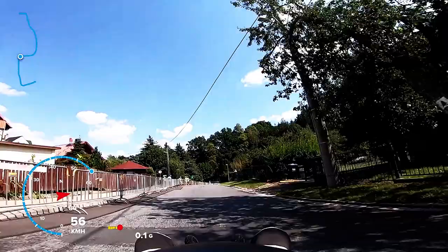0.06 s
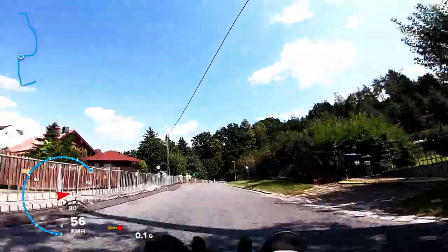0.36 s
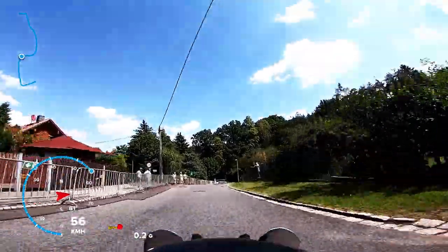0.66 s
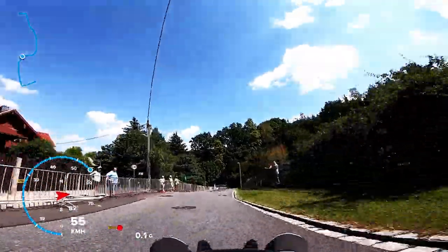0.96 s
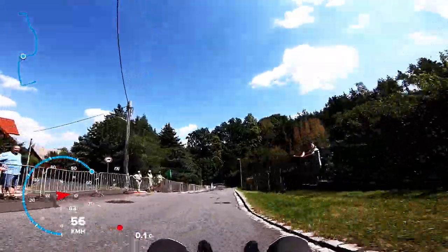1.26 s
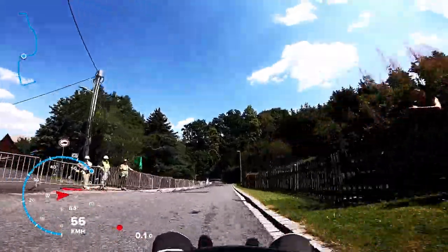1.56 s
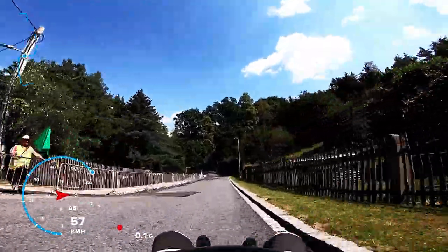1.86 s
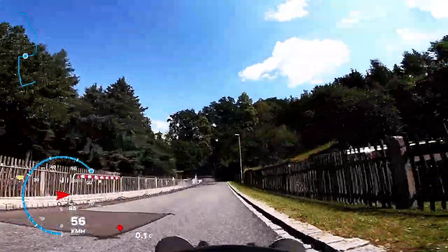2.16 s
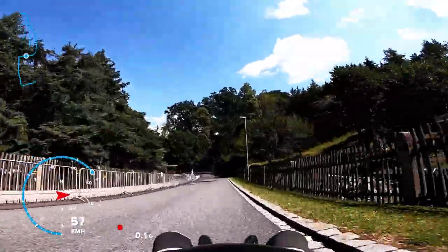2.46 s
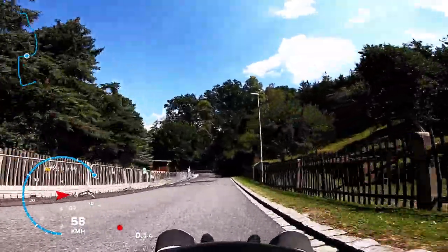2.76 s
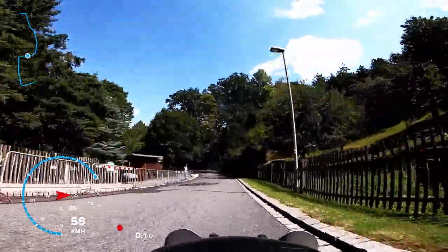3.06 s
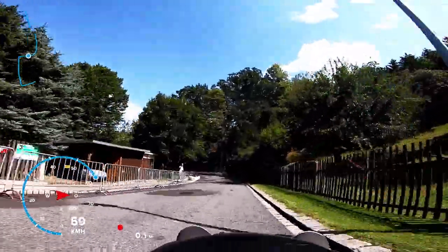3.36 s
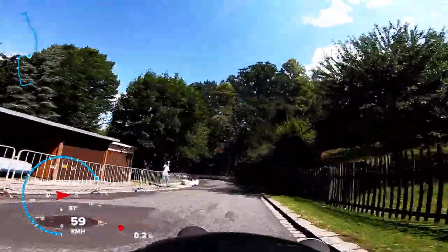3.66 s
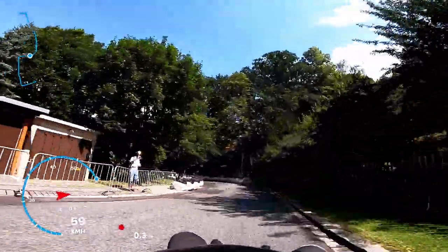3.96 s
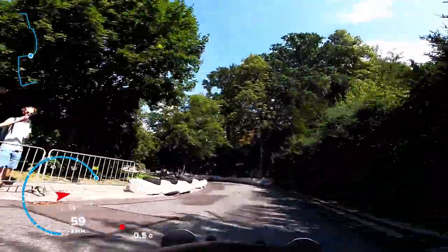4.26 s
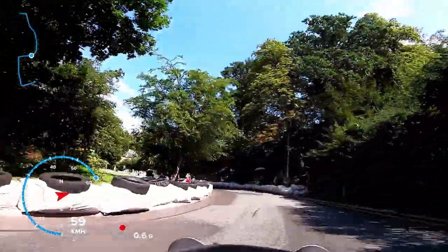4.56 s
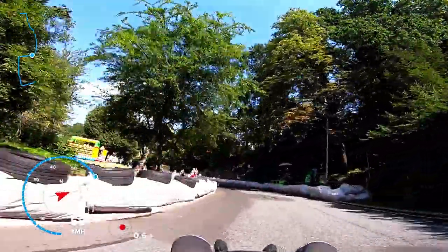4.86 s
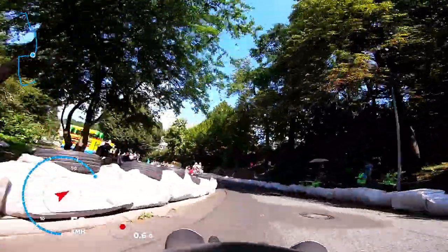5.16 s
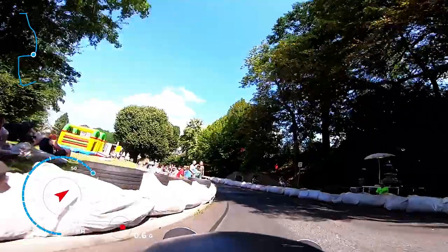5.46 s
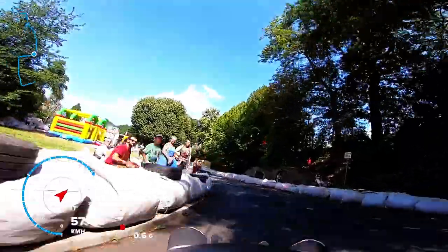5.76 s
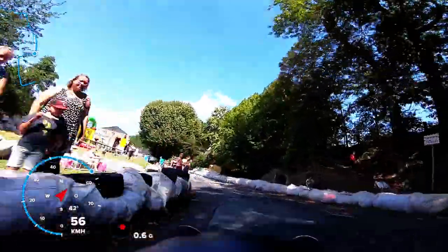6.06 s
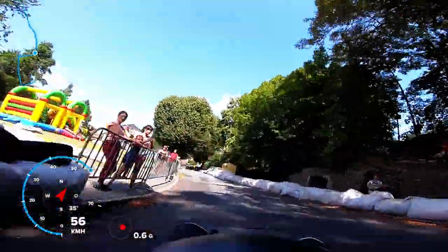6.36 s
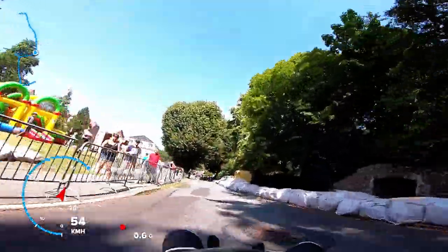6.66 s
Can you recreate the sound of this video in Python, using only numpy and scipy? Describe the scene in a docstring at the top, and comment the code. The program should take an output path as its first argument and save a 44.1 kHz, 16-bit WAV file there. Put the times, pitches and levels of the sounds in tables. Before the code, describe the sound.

A gravity cart rolls fast down an asphalt road, heard from a microphone fixed to its body. Gusts of wind rumble on the microphone and air hisses past, while the small wheels thrum and drum through the frame. Bumps knock and loose fittings rattle along the way. A little past halfway the tyres rasp into a bend and keep scrubbing as the hollow shell booms louder.

```python
"""Gravity cart racing into a bend

A cart rolls fast down an asphalt road, heard from a microphone fixed to its body. Wind buffets the
microphone and hisses past. The rough road drums through small wheels into the frame and hollow shell.
Bumps knock, loose fittings rattle, grit ticks, and the tyres scrub in the bend. A limiter tames the bass."""
import sys
import numpy as np
from scipy import signal
from scipy.fft import rfft, irfft
from scipy.io import wavfile
from scipy.ndimage import uniform_filter1d, minimum_filter1d

SR = 44100
rng = np.random.default_rng(int(sys.argv[2]) if len(sys.argv) > 2 else 0)


def output_pcm(signal):
    """Save a mono or channel-first signal as 16-bit PCM at the path in sys.argv[1].

    Samples are clipped to [-1, 1] before scaling.
    """
    pcm = np.clip(np.atleast_2d(signal).T, -1, 1) * 32767
    wavfile.write(sys.argv[1], SR, np.round(pcm).astype(np.int16))


N = 300321

# Larger bumps and seams in the road: start_s, level_db, contact_s
BUMP_HITS = [(0.361, -19, 0.00039), (0.424, -15, 0.00037), (0.571, -22, 0.00062), (1.506, -16, 0.00063),
             (1.571, -17, 0.00036), (1.7845, -7, .00042), (2.2813, -14.5, .0005), (2.2978, -15.5, .0005),
             (2.3729, -13, .00042), (2.853, -20, 0.00041), (3.663, -16, .00035), (3.6972, -12.5, 0.00032),
             (3.7065, -15, .0006), (4.205, -18, 0.0008), (4.873, -14.5, 0.00048), (6.227, -10, .0007),
             (6.3593, -20, 0.0004), (6.702, -14, 0.00032), (6.781, -12, 0.00037)]
# Louder rattles of loose fittings: start_s, level_db, pitch_hz
RATTLE_HITS = [(0.0225, -24, 2450), (0.2235, -31, 1700), (0.2768, -27, 1590), (0.5072, -27.5, 1670),
               (0.9205, -27.5, 2280), (0.9874, -29, 3320), (1.1688, -27.5, 1200), (1.5731, -29, 3000),
               (1.776, -24, 1700), (1.8118, -29, 3300), (1.9561, -24, 2660), (1.973, -32, 2800),
               (2.1001, -26, 2900), (2.2825, -28.5, 3500), (2.3216, -28, 2000), (3.6631, -32, 1800),
               (4.527, -26.5, 3700), (4.5597, -23.5, 1880), (4.7321, -25.5, 3880)]
# Grit flicked against the shell: start_s, level_db
GRIT_HITS = [(0.3257, -45), (1.4287, -45), (2.376, -49), (3.7983, -43), (4.3231, -45), (6.119, -48)]
# Notes at which the frame rings: pitch_hz, width_hz, level_db
FRAME_NOTES = [(353, 73, -2), (459.3, 107, -1), (531.4, 131, -2.5), (674, 104, -7), (775, 65, -10),
               (1204, 250, -20), (1498, 84, -20)]

# Tone colours, from low to high: frequency_hz, level_db
RUSH_COLOUR = [(1800, -2), (2600, -1.5), (3350, -1.5), (4300, -6), (5200, -11.5), (6400, -22),
               (8800, -21.5), (9800, -34)]  # air rushing past
WHISPER_COLOUR = [(4500, -4.5), (5500, 1.5), (6500, -0.5), (7350, 0.5), (7900, -7), (8750, -4),
                  (9600, -18.5), (10500, -14.5), (12000, -28.5)]  # air on the housing's edges
BUFFET_COLOUR = [(15, -9.5), (26, 9.5), (45, 15), (70, 11), (100, -15.5), (160, -27)]  # wind on the microphone
SCRUB_COLOUR = [(420, 0.5), (560, -9), (680, 2.5), (800, -0.5), (920, -4.5), (1300, -33), (3400, -30.5),
                (4600, -27), (6200, -44), (9000, -44.5)]  # tyres slipping sideways
TREAD_COLOUR = [(500, -5), (800, 1.5), (1020, 0), (1480, -1.5), (1680, -6), (2150, -8.5), (3200, -21.5),
                (5000, -35.5)]  # tread slapping the road
THRUM_COLOUR = [(58, -8), (80, 2), (118, -0.8), (143, -6.5), (170, -18.5), (220, -31)]  # wheels shaking on their tyres
BOOM_COLOUR = [(130, -2), (165, -1.5), (200, -1), (240, -2), (285, -6.5), (345, -8.5), (430, -30.5)]  # the hollow shell

# Slow rises and falls around the usual strength: time_s, level_db
ROAD_SHAKE = [(0.0, 0), (0.04, 4), (0.08, -5), (0.24, -1), (0.44, -0.5), (0.72, -4.5), (0.89, -6.5),
              (0.95, -2), (1.16, -7.5), (1.3, -2.5), (1.46, -8), (1.53, -2.5), (1.66, -4), (2.07, 1),
              (2.16, -3.5), (2.3, 3), (2.38, -3.5), (2.44, -2), (2.56, -5), (2.64, 0.5), (2.74, -3.5),
              (2.86, 3.3), (2.97, -4.5), (3.22, -4), (3.48, -5.5), (3.7, -0.5), (3.76, -4.5), (4.18, 2.5),
              (4.29, -1), (4.81, 3), (5.08, 0), (5.34, 3.5), (5.58, 0), (5.75, 6), (5.82, 0.6), (6.15, 4),
              (6.23, 0), (6.3, 4), (6.34, -1.5), (6.38, 4.5), (6.76, 3)]  # how hard the road shakes the cart
AIR_STRENGTH = [(0.0, 4), (0.08, -3.5), (0.3, 2), (0.48, -0.5), (0.6, -5.5), (0.85, -4.5), (1.32, -1),
                (1.48, -3.5), (1.72, 0), (2.0, 1.5), (2.32, -1.5), (2.44, -3.5), (2.8, 0.5), (3.45, 2.5),
                (3.69, 4.5), (3.75, -0.5), (3.85, 5), (4.08, 4), (4.55, 4), (5.04, 0.5), (5.28, 2.2),
                (5.6, 3), (5.72, 6), (5.85, 3.5), (6.14, 4.2), (6.45, 2.5), (6.76, -4)]  # airflow past the body
GUST_STRENGTH = [(0, 0.5), (.3, -3), (.5, 11), (.62, -1.5), (.75, 2.5), (1.2, -3), (1.48, -1), (1.65, -3.5),
                 (1.8, -4.5), (2.13, -1.5), (2.28, 8), (2.55, -3.5), (2.95, 4), (3.15, -0.5), (3.35, 3),
                 (3.62, 6), (3.95, -6), (4.55, 3.5), (5.15, -3), (5.35, -1.5), (5.65, -2.5), (6.0, -1.5),
                 (6.15, -4), (6.6, 4)]  # gusts on the microphone
THRUM_STRENGTH = [(0, -.5), (.2, 1.5), (.42, 1.5), (.65, 2), (1.05, -3.5), (1.22, 2), (1.52, -4.5),
                  (1.65, 0.5), (1.97, -0.5), (2.1, 2.5), (2.5, -1), (3.22, 2), (3.37, -3), (4.03, 2.5),
                  (4.17, -2), (4.28, 2), (4.45, -0.5), (5.3, -0.5), (5.6, -3), (6.05, -1), (6.6, -5.5)]  # the wheels' thrum

# Surges of load that make the shell boom and the frame drum: middle_s, length_s, rise_db
LOAD_SURGES = [(0.03, 0.025, 2.5), (0.13, 0.061, 7), (0.37, 0.36, 3), (4.22, 0.049, 2.5),
               (5.07, 0.087, 7.5), (5.17, 0.13, 4), (5.33, 0.076, 2.5), (6.1, 0.33, 2.5), (6.24, 0.1, 1),
               (6.6, 0.13, 2.5), (6.7, 0.029, 7)]
# Brief dips in the low rumble: middle_s, length_s, change_db
RUMBLE_DIPS = [(0.37, 0.045, -16), (1.16, 0.026, -4), (1.365, 0.018, -14), (2.04, 0.052, -6),
               (2.37, 0.03, -5), (3.815, 0.036, -13), (4.805, 0.043, -10), (6.355, 0.04, -13)]

BEND_START_S, BEND_FULL_S = 3.53, 4.24  # the cart leans into the bend between these times
TURN_IN_S, TURN_IN_LENGTH_S = 3.93, .56  # middle and length of the hardest steering
BEND_CALM = .35  # share by which the sideways load steadies the jolts


def from_db(db):
    """Turn decibels into a number to multiply by."""
    return 10 ** (np.asarray(db) / 20)


def rms_one(x):
    """Scale a sound to an average strength (rms) of 1."""
    return x / np.sqrt(np.mean(x ** 2) + 1e-20)


def curve(rows):
    """Join (time, value) points with straight lines, one value a sample."""
    times_s, values = np.transpose(rows)
    return np.interp(np.arange(N) / SR, times_s, values)


def swells(rows):
    """Bell-shaped swells, one for each (middle_s, length_s, height) row."""
    t = np.arange(N) / SR
    return sum(height * np.exp(-(2 * (t - s) / length_s) ** 2) for s, length_s, height in rows)


def drift(rate_hz):
    """A smooth random wobble that changes about rate_hz times a second."""
    hz = np.arange(N // 2 + 1) * SR / N
    return rms_one(irfft(rfft(rng.standard_normal(N)) / (1 + (hz / rate_hz) ** 2), N))


def coloured(x, colour):
    """Give a sound a tone colour that fades steeply beyond the table's ends."""
    hz, db = np.transpose(colour)
    hz = np.r_[hz[0] / 2, hz, hz[-1] * 2, hz[-1] * 4]
    db = np.r_[db[0] - 30, db, db[-1] - 60, db[-1] - 120]
    bins_hz = np.maximum(np.arange(N // 2 + 1) * SR / N, 1)
    gains = from_db(np.interp(np.log(bins_hz), np.log(hz), db))
    return rms_one(irfft(rfft(x) * gains, N))


def evened(x, over_s):
    """Even out swings of level slower than over_s and keep the faster ones."""
    size = int(over_s * SR)
    power = uniform_filter1d(uniform_filter1d(x * x, size), size)
    return rms_one(x / np.sqrt(power + 1e-9))


def ring(x, hz, *widths_hz):
    """Make a sound ring at one pitch, once for each width; narrower rings longer."""
    for width_hz in widths_hz:
        r = np.exp(-np.pi * width_hz / SR)
        feedback = [1, -2 * r * np.cos(2 * np.pi * hz / SR), r * r]
        x = signal.lfilter(np.array([1, 0, -1]) * (1 - r * r) / 2, feedback, x)
    return x


def keep_side(x, hz, side):
    """Keep the "low" or "high" side of hz and soften the rest."""
    return signal.sosfilt(signal.butter(2, hz, side, fs=SR, output="sos"), x)


def add(out, start_s, sound, peak_db):
    """Mix in a short sound at the given peak level."""
    start = max(round(start_s * SR), 0)
    out[start:start + len(sound)] += (from_db(peak_db) * sound / np.max(np.abs(sound)))[:N - start]


def stones(per_s, spread_db):
    """Random clicks of uneven size: the asphalt's stones meeting the wheels."""
    sizes = from_db(spread_db * np.minimum(rng.exponential(1, N), 4))
    return sizes * rng.choice([-1, 1], N) * (rng.random(N) < per_s / SR)


def jolts(rate_hz=27, settle_s=0.22):
    """Quick, random shaking of the cart with no lasting swell."""
    shake = drift(rate_hz)
    return evened(shake - uniform_filter1d(shake, int(settle_s * SR)), settle_s)


def frame_ring(push, spread_db):
    """A push rings all the frame's notes, each with a partly random strength."""
    gains = from_db(spread_db * rng.standard_normal(len(FRAME_NOTES)))
    notes = sum((-1) ** k * gains[k] * from_db(db) * ring(push, hz, width_hz)
                for k, (hz, width_hz, db) in enumerate(FRAME_NOTES))
    return keep_side(keep_side(notes, 1700, "low"), 270, "high")


def air_hiss(flow_db, jolt, bend):
    """Air tears past and flutters; the housing's edges add a steadier high whisper."""
    flutter_db = 1.2 * jolt + (1.1 - 0.14 * bend) * drift(57)
    rush_db = -47 + 0.9 * flow_db - 0.64 * bend + flutter_db
    rush = from_db(rush_db) * coloured(rng.standard_normal(N), RUSH_COLOUR)
    whisper_db = -60 + 0.41 * flow_db + 0.5 * flutter_db + 1.3 * drift(40)
    return rush + from_db(whisper_db) * coloured(rng.standard_normal(N), WHISPER_COLOUR)


def wind_buffet(gust_db):
    """Swirls of air push on the microphone, in gusts with lulls between."""
    level_db = -19.5 + gust_db + drift(23)
    buffet = coloured(rng.standard_normal(N), BUFFET_COLOUR)
    return from_db(level_db) * evened(buffet, over_s=0.15)


def grit(fade_s=0.013, pitch_hz=7550):
    """Small stones tick against the shell with a thin, high ring."""
    out, t = np.zeros(N), np.arange(SR // 20) / SR
    for start_s, db in GRIT_HITS:
        contact = rng.standard_normal(len(t)) * from_db(-60 * t / fade_s)
        add(out, start_s, ring(contact, pitch_hz, 550, 1600), db + 1)
    return out


def chippings(road_db, jolt, pitch_hz=2300):
    """Loose chips of stone crackle under the wheels, most where the road is rough."""
    crackle = ring(stones(per_s=330, spread_db=2.5), pitch_hz, 2400, 2400)
    return from_db(-51 + 0.95 * road_db + jolt) * rms_one(keep_side(crackle, 3800, "low"))


def rattles(fade_s=0.055, bounces_per_s=1700, clack_hz=1400, faint_count=10, faint_db=-30.5):
    """Loose fittings strike, bounce and clack on the frame; faint ones join in at random."""
    out, t = np.zeros(N), np.arange(SR // 12) / SR
    faint = [(when * N / SR, faint_db, 3200 * 2 ** (pitch - .5))
             for when, pitch in rng.random((faint_count, 2))]
    for start_s, db, pitch_hz in faint + list(RATTLE_HITS):
        bounces = rng.uniform(-1, 1, len(t)) * (rng.random(len(t)) < bounces_per_s / SR)
        bounces[0] = 1  # the first sharp strike
        chatter = bounces * from_db(-60 * t / fade_s)
        for hz, part_db in (pitch_hz, 0), (clack_hz, -3.5):
            ringing = ring(chatter, hz, 2000, 2200)
            add(out, start_s, keep_side(ringing, 1600, "low"), db + part_db)
    return out


def bumps(rise_s=0.002, thud_fade_s=0.071, crack_fade_s=0.009):
    """A wheel is kicked up and drops back; the frame rings, the shell thuds, the joints crack."""
    out, t = np.zeros(N), np.arange(SR // 10) / SR
    for start_s, db, contact_s in BUMP_HITS:
        from_peak = (t - rise_s) / contact_s
        push = (1 - from_peak ** 2) * np.exp(-from_peak ** 2 / 2) * np.minimum(t / rise_s, 1)
        thud_hz = 230 * np.exp(0.12 * rng.standard_normal())
        thud = np.sin(2 * np.pi * thud_hz * t) * from_db(-60 * t / thud_fade_s)
        burst = rng.standard_normal(len(t)) * from_db(-60 * t / crack_fade_s)
        crack = keep_side(ring(burst, 1900, 1300), 3300, "low")
        add(out, start_s, push, db)
        add(out, start_s, frame_ring(push, spread_db=2.5), db - 9)
        add(out, start_s, thud, db - 7)
        add(out, start_s + rise_s / 2, crack, db - 12.5)
    return keep_side(out, 4200, "low")


def cornering(road_db, bend, sing_hz=1170, rasp_hz=2000):
    """The tread sings and rasps on grit as the cart turns in, then scrubs sideways with a hollow roar."""
    scrub = coloured(stones(per_s=9000, spread_db=4.5), SCRUB_COLOUR)
    sing = rms_one(ring(rng.standard_normal(N), sing_hz, 300, 700))
    scratches = ring(stones(per_s=2600, spread_db=10.0), rasp_hz, 1400, 1800)
    rasp = rms_one(keep_side(scratches, 3000, "low"))
    steering = swells([(TURN_IN_S, TURN_IN_LENGTH_S, 1)])
    turn_in = steering * (from_db(-40) * sing + from_db(-45) * rasp)
    scrub_db = -32.5 + 0.3 * road_db + 0.64 * drift(40)
    return bend * from_db(scrub_db) * scrub + turn_in


def tyre_roar(road_db, flow_db, jolt):
    """Tread slaps the stones in a gritty roar that grows with road shake, airflow and jolts."""
    tread = coloured(stones(per_s=7000, spread_db=3.5), TREAD_COLOUR)
    level_db = -36.5 + 0.13 * road_db + 0.38 * flow_db + 0.68 * jolt + 1.1 * drift(45)
    return from_db(level_db) * tread


def frame_drumming(road_db, jolt, bend):
    """The road's grain drums on the frame; in the bend it swells with each surge of load."""
    ringing = frame_ring(stones(per_s=3800, spread_db=3.5), spread_db=0)
    drumming = rms_one(keep_side(ringing, 6000, "low"))
    load_db = bend * (0.7 + 0.29 * swells(LOAD_SURGES))
    return from_db(-29.5 + 0.8 * road_db + load_db + 1.84 * jolt) * drumming


def shell_boom(road_db, bend):
    """The hollow shell booms under load, about an octave above the wheels' thrum."""
    level_db = -24 + 0.77 * road_db + 0.5 * bend + swells(LOAD_SURGES)
    boom = coloured(stones(per_s=2200, spread_db=3.0), BOOM_COLOUR)
    return from_db(level_db) * evened(boom, over_s=0.25)


def wheel_thrum(wheel_db):
    """Waves in the asphalt make the wheels thrum on their tyres."""
    level_db = -20 + wheel_db + 1.5 * drift(18)
    thrum = coloured(rng.standard_normal(N), THRUM_COLOUR)
    return from_db(level_db) * evened(thrum, over_s=0.25)


def scene():
    """Mix wind, rolling and small knocks; the same jolts shake frame, tyres, chippings and air."""
    road_db, flow_db, dip_db = curve(ROAD_SHAKE), curve(AIR_STRENGTH), swells(RUMBLE_DIPS)
    bend = curve([(BEND_START_S, 0), (BEND_FULL_S, 1)])
    jolt = jolts() * (1 - BEND_CALM * bend)
    rolling = wheel_thrum(curve(THRUM_STRENGTH) + dip_db) + shell_boom(road_db, bend)
    rolling += frame_drumming(road_db, jolt, bend)
    rolling += tyre_roar(road_db, flow_db, jolt) + cornering(road_db, bend)
    knocks = chippings(road_db, jolt) + bumps() + rattles() + grit()
    wind = wind_buffet(curve(GUST_STRENGTH) + dip_db) + air_hiss(flow_db, jolt, bend)
    return (wind + rolling + knocks)[None]


def limit_bass(x, split_hz=150, ceiling_db=-13.5, release_db_per_s=220):
    """A limiter turns the bass down just before it gets too loud, then quickly lets go."""
    bass = signal.sosfiltfilt(signal.butter(2, split_hz, fs=SR, output="sos"), x)
    over_db = np.maximum(20 * np.log10(np.abs(bass) + 1e-9) - ceiling_db, 0)
    fall_db = release_db_per_s * np.arange(N) / SR
    held_db = np.maximum.accumulate(over_db + fall_db, axis=-1) - fall_db
    gain = uniform_filter1d(minimum_filter1d(from_db(-held_db), size=300), size=300)
    return x + bass * (gain - 1)


def record(dry, cutoff_hz=12500):
    """Limit the bass and cut off the highest treble."""
    return signal.sosfilt(signal.butter(12, cutoff_hz, fs=SR, output="sos"), limit_bass(dry))


dry = scene()
out = record(dry)
output_pcm(out)
```